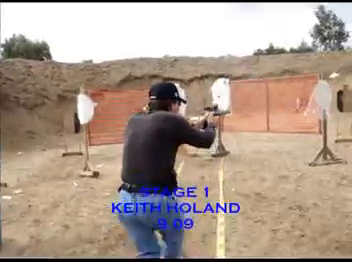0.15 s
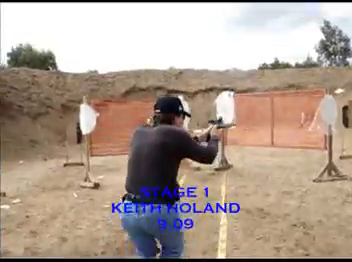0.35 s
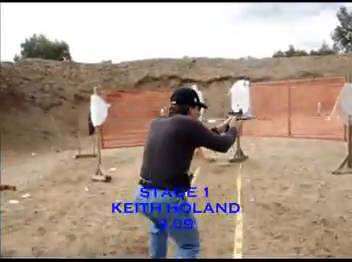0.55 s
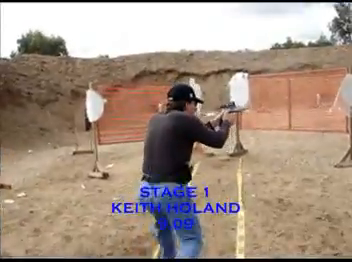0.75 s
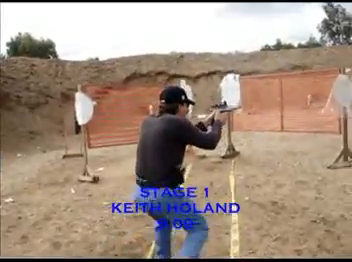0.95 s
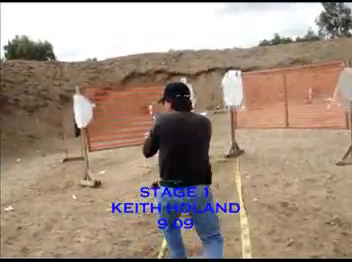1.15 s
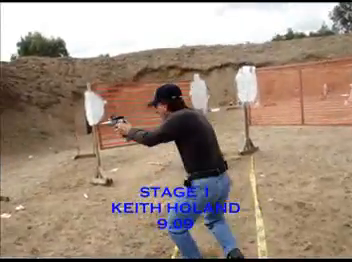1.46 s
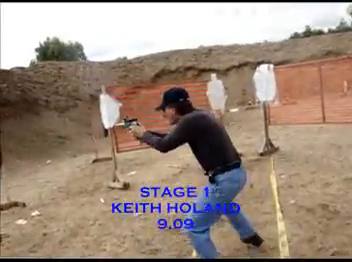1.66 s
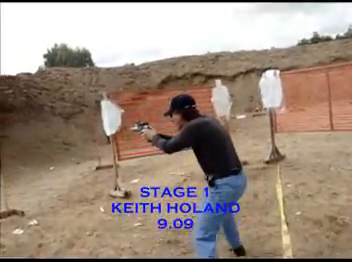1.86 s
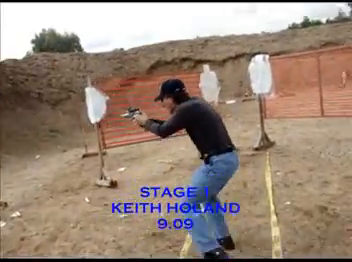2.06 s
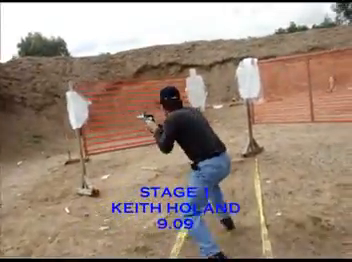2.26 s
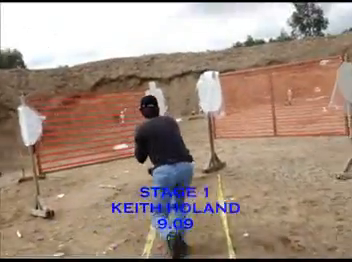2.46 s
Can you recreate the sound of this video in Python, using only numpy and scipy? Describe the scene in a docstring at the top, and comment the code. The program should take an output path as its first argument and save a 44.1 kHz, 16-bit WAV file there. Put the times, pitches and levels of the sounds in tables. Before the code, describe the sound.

Eight handgun shots crack loudly at an outdoor range, four in the first second, a brief pause with faint dirt scuffs, then two more pairs with a dull knock between, overloading a small nearby camera microphone.

```python
"""Over a steady hiss, a faint scuff on dirt leads into eight handgun shots, fired in pairs on an outdoor range.
Each shot is an N-shaped pulse and a noise crack that overload the microphone, then scatter off ground and props,
then echoes from a side berm and, sooner shot by shot as the shooter advances, from the back berm, then a tail.
Two more scuffs of swelling noise fall before the fifth shot.
A dull knock of short ringing modes, with a faint noise rattle, falls between the sixth and seventh."""
import sys
import numpy as np
from scipy import signal
from scipy.fft import rfft, irfft
from scipy.io import wavfile

SR = 44100
rng = np.random.default_rng(int(sys.argv[2]) if len(sys.argv) > 2 else 0)


def digitize_waveform(pressure):
    """Quantize a signal to 16-bit integers and store it at the path in sys.argv[1].

    Rows of a 2-D input are taken as channels; values are limited to [-1, 1].
    """
    field = np.atleast_2d(pressure).T
    bounded = np.clip(field, -1, 1)
    quanta = np.round(bounded * 32767).astype(np.int16)
    wavfile.write(sys.argv[1], SR, quanta)


N = 114660


# The shots: t/s, level/dB, bass/dB, treble/dB, side echo/dB (before a common 3.5 dB cut),
# back echo/dB, tail/dB (on top of the common tail levels)
SHOTS = [(0.2279, 1, 1, -0.5, -9, -25, 0), (0.394, 1.5, -1, -3.5, -7.5, -20, -2.5),
         (0.6320, -1, 2, 0, -8.5, -22, -1.5), (1.0171, 0, 0, -0.5, -6.5, -22.5, -1.5),
         (1.6378, 2.5, -3, -3, -11.5, -21, -13), (1.7866, -1, 2.5, -0.5, -9, -19, -1),
         (2.089, 1.5, -0.5, -3.5, -17.5, -20.5, -6), (2.2674, 0, -0.5, -2.5, -14.5, -18.5, -2.5)]
# Echo delays after each shot: side berm t/s, back berm t/s (the back one shrinks as the shooter advances)
ECHO_DELAYS = [(.043, .109), (.039, .108), (.043, .1065), (.040, .1045), (.037, .103), (.029, .102),
               (.032, .0985), (.033, .097)]


def handgun():
    """All the shots, each with its own balance; part of their near scatter takes the same paths every time."""
    out, shared_paths = np.zeros(N), reflections(BLAST_COLOUR)
    for settings, (side_s, back_s) in zip(SHOTS, ECHO_DELAYS):
        start, db, bass_db, treble_db, side_db, back_db, tail_db = settings
        sound = (muzzle_blast() + near_scatter(shared_paths) + prop_echo()
                 + side_berm_echo(side_s, side_db) + back_berm_echo(back_s, back_db) + range_tail(tail_db))
        bass, rest = split(sound, 600)
        middle, treble = split(rest, 2500)
        add(out, undb(db) * (undb(bass_db) * bass + middle + undb(treble_db) * treble), start)
    return out


# Colour of the blast and near scatter: f/Hz, relative level/dB per Hz
BLAST_COLOUR = [(30, -41.5), (100, -33), (150, -15), (220, -14.5), (400, -4), (490, -4), (600, 2.5),
                (950, 0.5), (1400, -4), (2300, -7), (3300, -7.5), (6000, -13.5), (10000, -22.5)]
PULSE_DB, PULSE_S = -2, 0.001
CRACK_DB, CRACK_DECAY_S = 3, 0.0047  # time to fall to 1/e


def muzzle_blast():
    """The pressure jumps up, slopes down through zero and snaps back; a burst of treble noise cracks with it."""
    t = one_second()
    pulse = undb(PULSE_DB) * (1 - 2 * t / PULSE_S) * (t < PULSE_S)
    noise = colour(rng.standard_normal(SR), BLAST_COLOUR)
    crack = undb(CRACK_DB) * split(noise, 2700)[1] * np.exp(-t / CRACK_DECAY_S)
    return pulse + crack


SCATTER_DB, SCATTER_HOLD_S, SCATTER_T60_S, SCATTER_TREBLE_T60_S = -4.5, 0.0085, 0.22, 0.19
SHARED_POWER = 0.23  # share of the scatter's power that is common to all shots


def near_scatter(shared_paths):
    """Dense reflections from the ground and props; the treble starts faster, dies sooner and comes in clumps."""
    t = one_second()
    own_paths = reflections(BLAST_COLOUR)
    paths = np.sqrt(SHARED_POWER) * shared_paths + np.sqrt(1 - SHARED_POWER) * own_paths
    low, high = split(paths, 2000)
    low = low * envelope(t, 0.00085, SCATTER_HOLD_S, SCATTER_T60_S)
    high = high * envelope(t, 0.0003, SCATTER_HOLD_S, SCATTER_TREBLE_T60_S) * echo_clumps()
    return undb(SCATTER_DB) * (low + high)


# Colour of the echoes from props and both berms: f/Hz, relative level/dB per Hz
BERM_COLOUR = [(30, -44.5), (100, -33), (160, -22), (300, -14.5), (450, -6), (620, 1.5), (1150, 4.5),
               (1700, -4), (3300, -2), (6000, -11.5), (10000, -18.5)]
PROP_DB, PROP_DELAY_S, PROP_RISE_S, PROP_T60_S = -9.5, 0.019, 0.002, 0.029


def prop_echo():
    """A short cluster of reflections from the nearest props."""
    swell = envelope(one_second() - PROP_DELAY_S, PROP_RISE_S, PROP_RISE_S, PROP_T60_S)
    return undb(PROP_DB) * reflections(BERM_COLOUR) * swell


SIDE_RISE_S, SIDE_HOLD_S, SIDE_T60_S = 0.0066, 0.0092, 0.082


def side_berm_echo(delay_s, db):
    """The earth slope at the side smears its reflection into an uneven swell."""
    swell = envelope(one_second() - delay_s, SIDE_RISE_S, SIDE_HOLD_S, SIDE_T60_S)
    return undb(db - 3.5) * reflections(BERM_COLOUR) * swell * echo_clumps()


BACK_RISE_S, BACK_HOLD_S, BACK_T60_S = 0.0012, 0.0028, 0.035


def back_berm_echo(delay_s, db):
    """The back berm answers later with a shorter, brighter slap."""
    bright = split(reflections(BERM_COLOUR), 1200)[1]
    return undb(db) * bright * envelope(one_second() - delay_s, BACK_RISE_S, BACK_HOLD_S, BACK_T60_S)


# Colour of the tail: f/Hz, relative level/dB per Hz
TAIL_COLOUR = [(40, -29), (110, -26.5), (200, -10), (400, -5.5), (650, 1), (1150, -3), (1800, -5.5),
               (3300, -9.5), (6000, -15.5), (10000, -27)]
TAIL_RISE_S, TAIL_HOLD_S = 0.05, 0.13
TAIL_DB, TAIL_T60_S = -35, 0.26
FAR_DB, FAR_T60_S = -52, 0.85  # faint late wash from far slopes


def range_tail(db):
    """The range rings on in many mingled reflections, with a slower fade from far slopes beneath."""
    t = one_second()
    fade = undb(TAIL_DB) * envelope(t, TAIL_RISE_S, TAIL_HOLD_S, TAIL_T60_S)
    far_fade = undb(FAR_DB) * envelope(t, TAIL_RISE_S, TAIL_HOLD_S, FAR_T60_S)
    return undb(db) * reflections(TAIL_COLOUR) * (fade + far_fade)


# Ringing modes of the knock: f/Hz, relative level/dB, T60 t/s
KNOCK_MODES = [(383, 7, 0.029), (340, -8, 0.038), (940, -3, 0.026), (1370, -3, 0.015), (1550, -1, 0.013),
               (2050, -9, 0.014)]
# Colour of its rattle: f/Hz, relative level/dB per Hz
RATTLE_COLOUR = [(60, -17), (200, -3.5), (380, 4.5), (750, 2), (1200, -7), (1800, -11), (3000, -17.5),
                 (10000, -36)]
KNOCK_START_S, KNOCK_DB, KNOCK_LOW_CUT_HZ = 1.9744, -16, 260
RATTLE_DB, RATTLE_HOLD_S, RATTLE_T60_S = -35.5, 0.063, 0.25


def knock():
    """A few heavily damped modes ring together, with a faint uneven rattle of noise that outlasts them."""
    out, t = np.zeros(N), one_second()
    ring = np.zeros(SR)
    for hz, db, t60 in KNOCK_MODES:
        ring += undb(db) * np.sin(2 * np.pi * hz * t) * envelope(t, 0.0006, 0, t60)
    rattle = colour(rng.standard_normal(SR), RATTLE_COLOUR)
    rattle *= envelope(t, 0.0038, RATTLE_HOLD_S, RATTLE_T60_S) * patchy(SR, depth_db=2.8, patch_s=0.004)
    ring = low_cut(ring, KNOCK_LOW_CUT_HZ, order=2)
    add(out, undb(KNOCK_DB) * ring + undb(RATTLE_DB) * rattle, KNOCK_START_S)
    return out


# Scuffs on dirt: t/s, length t/s, level/dB
SCUFFS = [(0.083, 0.055, -57), (1.407, 0.046, -54), (1.53, 0.069, -56.5)]
# Colour of the grit: f/Hz, relative level/dB per Hz
SCUFF_COLOUR = [(60, -40), (200, -5), (350, 3), (550, 1), (750, 9.5), (1150, 7.5), (1700, -6), (4000, -5),
                (10000, -17)]


def scuffs():
    """Shoes on dirt: coloured noise, broken into grains, swells and fades."""
    out, t = np.zeros(N), one_second()
    for start, length, db in SCUFFS:
        grit = colour(rng.standard_normal(SR), SCUFF_COLOUR) * patchy(SR, depth_db=6.0, patch_s=0.00375)
        swell = np.sin(np.pi * np.minimum(t / length, 1))
        add(out, undb(db) * grit * swell, start)
    return out


# Colour of the background hiss: f/Hz, relative level/dB per Hz
HISS_COLOUR = [(20, 14.5), (60, 5), (130, -1.5), (250, -6), (400, -2), (750, -1.5), (1200, -3.5),
               (2000, -2.5), (4000, -2.5), (7000, -4), (10000, -5.5)]
HISS_DB = -58


def background_hiss():
    """Steady noise, strongest per Hz in the bass."""
    return undb(HISS_DB) * colour(rng.standard_normal(N), HISS_COLOUR)


ARRIVALS_PER_S, DISTINCT_POWER = 2000, 0.47  # separate reflections; their share of the scattered power


def reflections(points):
    """One second of separate arrivals, of random sign, over a diffuse wash, all in one colour."""
    chance = ARRIVALS_PER_S / SR
    hits = rng.random(SR) < chance
    arrivals = hits * np.sign(rng.standard_normal(SR)) / np.sqrt(chance)
    wash = rng.standard_normal(SR)
    return colour(np.sqrt(DISTINCT_POWER) * arrivals + np.sqrt(1 - DISTINCT_POWER) * wash, points)


def patchy(size, depth_db, patch_s):
    """Gain that wanders at random in dB, as when reflections or grains arrive in uneven clumps."""
    steps = rng.standard_normal(2048)
    place = np.arange(size) / SR / patch_s
    return undb(depth_db * np.interp(place, np.arange(len(steps)), steps))


def echo_clumps():
    """The unevenness of the scatter and side echo."""
    return patchy(SR, depth_db=3, patch_s=0.0018)


def envelope(t, rise, hold, t60):
    """Linear rise, hold until a time from the start, exponential release."""
    return np.clip(t / rise, 0, 1) * np.exp(-np.log(1000) * np.maximum(t - hold, 0) / t60)


EDGE_HZ = 14200  # upper edge of the noise colours and of the final sound


def colour(x, points):
    """Minimum-phase filter along an (f/Hz, dB) curve that falls away at the top, keeping white-noise power."""
    hz, db = np.array(points, float).T
    f = np.maximum(np.fft.rfftfreq(len(x), 1 / SR), 1)
    gain = undb(np.interp(np.log(f), np.log(hz), db)) / np.sqrt(1 + (f / EDGE_HZ) ** 20)
    cepstrum = irfft(np.log(gain / np.sqrt(np.mean(gain ** 2))), len(x))
    fold = 1 + np.sign(np.fft.fftfreq(len(x)))  # folding the cepstrum makes the filter causal
    return irfft(rfft(x) * np.exp(rfft(cepstrum * fold)), len(x))


def split(x, hz):
    """The parts below and above a frequency, which add back to the whole."""
    low = signal.sosfiltfilt(signal.butter(2, hz, fs=SR, output="sos"), x)
    return low, x - low


def low_cut(x, hz, order):
    """Take the bass out."""
    return signal.sosfilt(signal.butter(order, hz, "high", fs=SR, output="sos"), x)


def high_cut(x, hz):
    """Steep low-pass, run both ways so that it adds no delay."""
    return signal.sosfiltfilt(signal.ellip(8, 0.1, 45, hz, fs=SR, output="sos"), x)


def undb(db):
    """Decibels to gain."""
    return 10 ** (np.asarray(db) / 20)


def one_second():
    """Time axis in seconds."""
    return np.arange(SR) / SR


def add(out, x, start):
    """Mix a sound in at a time in seconds."""
    i = int(start * SR)
    out[i:i + len(x)] += x[:len(out) - i]


def scene():
    """Shots, knock, scuffs and hiss at one microphone, the same in both channels."""
    mono = handgun() + knock() + scuffs() + background_hiss()
    return np.array([mono, mono])


DRIVE_CEILING, CLIP_PEAK = 0.94, 0.98  # full scale is 1
LOW_CUT_HZ, TOP_HZ = 200, 10000
SPILL_DB = -33.5  # what passes above the main cut-off


def record(dry):
    """A small camera squashes the blasts, thins the bass, passes little above 10 kHz and clips overshoots."""
    squashed = DRIVE_CEILING * np.tanh(dry / DRIVE_CEILING)
    thinned = low_cut(squashed, LOW_CUT_HZ, order=1)
    narrow = high_cut(thinned, TOP_HZ) + undb(SPILL_DB) * thinned
    return high_cut(np.clip(narrow, -CLIP_PEAK, CLIP_PEAK), EDGE_HZ)


dry = scene()
out = record(dry)
digitize_waveform(out)
```